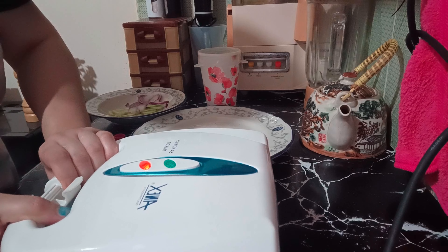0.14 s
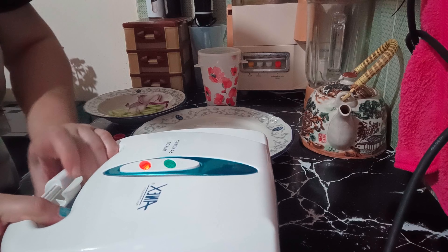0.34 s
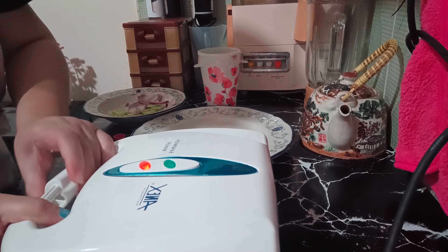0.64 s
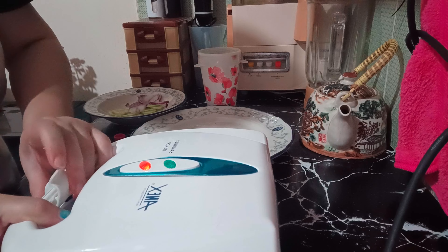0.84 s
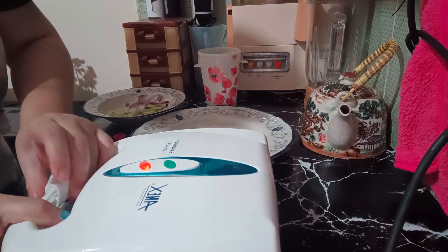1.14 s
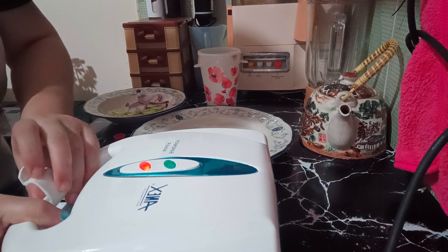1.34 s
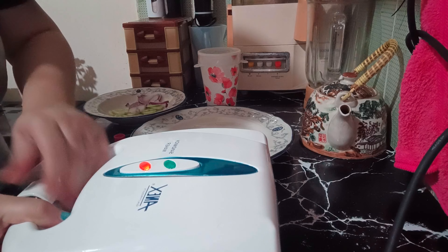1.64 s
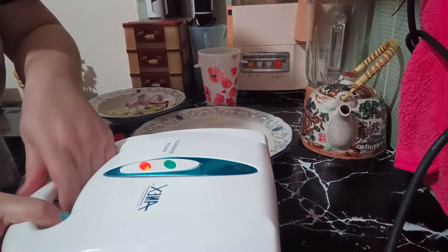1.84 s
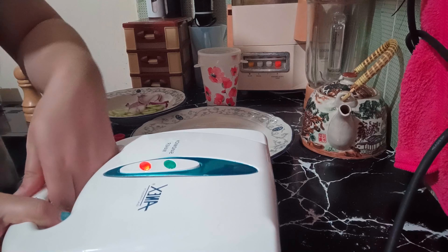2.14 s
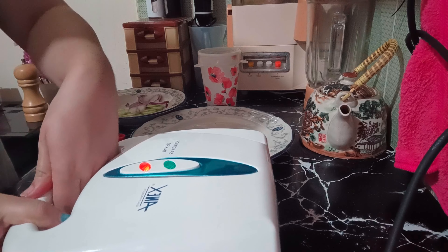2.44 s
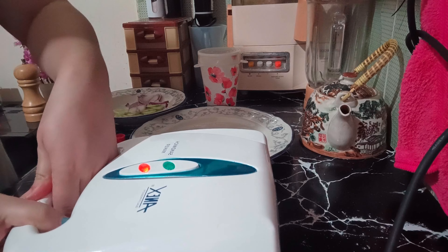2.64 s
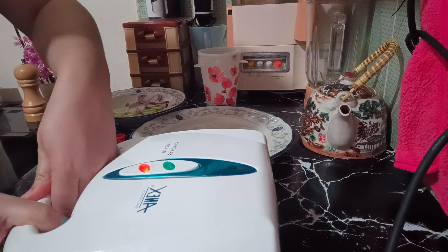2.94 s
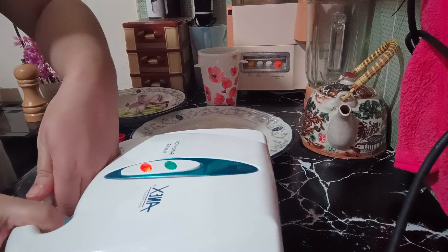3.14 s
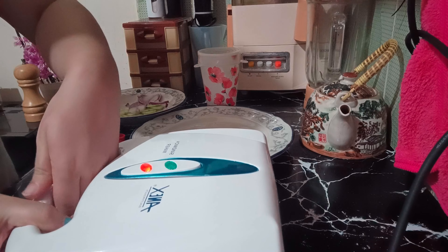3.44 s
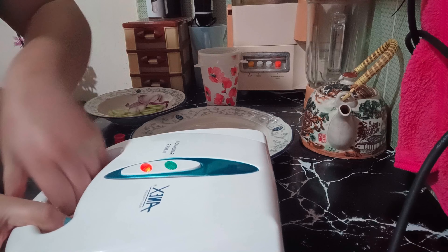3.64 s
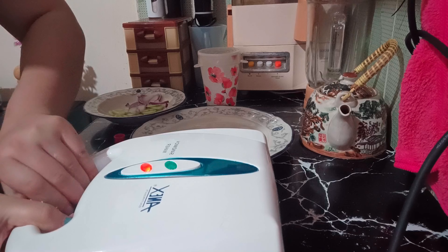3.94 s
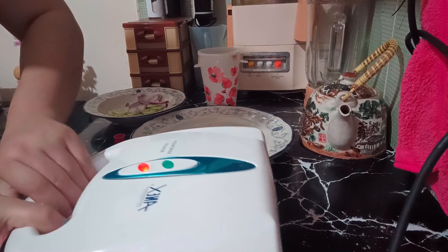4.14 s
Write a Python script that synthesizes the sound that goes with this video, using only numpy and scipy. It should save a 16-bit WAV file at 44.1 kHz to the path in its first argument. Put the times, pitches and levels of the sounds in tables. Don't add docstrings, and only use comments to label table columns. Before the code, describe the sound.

A sandwich maker's plastic latch is worked on a stone counter: a rising burst of light taps, a sharp click, a short rubbing creak, then the strongest snap with bright metallic ring. Lighter snaps come at intervals among dull knocks and soft bumps. After near quiet, tiny nail clicks lead into a weighty closing thump. Close, dry handling with short bright room reflections over quiet rumble.

```python
import sys
import numpy as np
from scipy import signal
from scipy.io import wavfile
from scipy.ndimage import map_coordinates

SR = 44100
rng = np.random.default_rng(int(sys.argv[2]) if len(sys.argv) > 2 else 0)


def master_out(mix):
    frames = np.transpose(np.atleast_2d(mix))
    ceiling = np.clip(frames, -1, 1)
    pcm = np.round(ceiling * 32767).astype(np.int16)
    wavfile.write(sys.argv[1], SR, pcm)


def invert_db(level):
    return 10 ** (np.asarray(level, dtype=float) / 20)


N = 188790

# (frequency [Hz], density [dB per Hz])
RUMBLE_SPECTRUM = [(25, -24), (150, -5), (240, -24.5), (345, -10), (1080, -23), (2690, -30), (11000, -43),
                   (14300, -84)]
# (frequency [Hz], correlation [-1..1])
RUMBLE_LIKENESS = [(60, 1), (240, -0.11), (950, 0.01), (3770, 0.2), (15000, -0.48)]
# (frequency [Hz], width [Hz], level [dB])
HUM = [(201.4, 57, -71.5), (345, 22, -84.5), (407.4, 3.4, -85)]
# (time [s], swell [dB])
LEANS = [
    (0.02, 3),
    (1.83, 8),
    (3.1, 5),
    (3.45, -3.5),
    (4.27, 9.5),
]
RUMBLE_DB, LEAN_S = -70.5, 0.11

# (frequency [Hz], t60 [s])
ROOM_T60 = [(300, 0.1), (1000, 0.31), (3000, 0.33), (7000, 0.29), (14000, 0.25)]
# (frequency [Hz], level [dB])
ROOM_COLOUR = [(250, -14), (600, 1.5), (1500, -12.5), (4000, -6.5), (8000, -9.5), (12000, -3.5),
               (15500, -14.5)]
# (frequency [Hz], level [dB], t60 [s])
PLATE_MODES = [(2850, -18, 0.12), (3576, -15.5, 0.96), (4330, -11.5, 0.13), (5840, -3, 0.32),
               (7150, 0.5, 0.41), (7330, -8.5, 0.12)]
# (time [s], frequency [Hz], level [dB], t60 [s])
AFTER_RING = [
    (1.826, 7560, -40, .5),
    (2.226, 2630, -57, .6),
    (2.226, 3600, -52, .4),
    (2.226, 5800, -56, .4),
    (2.226, 7900, -55, .4),
    (3.155, 3300, -55, .4),
    (3.155, 4500, -49, .45),
    (3.155, 5630, -49, .5),
    (3.155, 7600, -52, .4),
]
ROOM_DB, WAVER_T60_S = -8, 0.03

# (time [s], peak [dB], frequency [Hz], t60 [s], overtone [dB])
THUDS = [
    (0.009, -46.5, 184, 0.013, -9),
    (1.269, -57, 220, 0.072, -14),
    (1.42, -63.5, 102, 0.27, -9),
    (1.663, -48.5, 188.5, 0.24, -10.5),
    (1.827, -51, 196, 0.27, -9),
    (2.571, -43, 183, 0.18, -20),
    (2.618, -47, 133.2, 0.203, -6),
    (3.068, -57, 111.2, 0.1, -13),
]
# (time [s], peak [dB], frequency [Hz], t60 [s], overtone [dB])
SLAM = [
    (4.256, -15.5, 418.2, 0.068, -32),
    (4.265, -14.5, 155.6, 0.45, -2.5),
]

# (frequency [Hz], level [dB], t60 [s])
SHELL = [(500, -7.5, 0.032), (566, 14, 0.039), (633.6, 4, 0.15), (743, -1.3, 0.045)]
LID = [(857.6, -20.5, 0.053), (1052, -12, 0.042), (1186, -2, 0.014), (1547, -5.5, 0.024),
       (1824, -9, 0.0097), (1965, 1.5, 0.0097), (1930, -11.5, 0.019)]
HANDLE = [(880, -13, .03), (1085, 1.5, .045), (1300, -12, .025), (1560, -12, .02), (1850, -8, .025),
          (2150, -11, .02)]
LATCH = [(2510, -19, 0.0027), (2970, 3.5, 0.0027), (3490, -5, 0.011), (4104, -2.5, 0.0092),
         (4500, 3.5, 0.0014), (5605, 1, 0.00081)]
EDGE = [(6087, 1, 0.0017), (5883, 1.5, 0.0046), (7000, -9.5, 0.0027), (7700, -3.5, 0.013),
        (8234, -4.5, 0.00076)]
HINGE = [(5800, -11, .006), (6100, 3, 0.003), (6800, -7.5, 0.0027), (7900, -4, .008), (7850, -1, 0.0035)]
RIM = [(9100, -5.5, 0.0025), (10200, 3, 0.0015), (11400, -1.5, 0.0026), (12500, -3, 0.002),
       (13300, -1.5, .002), (15770, -4.5, 0.0036), (15470, -3, 0.0016)]
STRIKE_SPREAD_DB, SIDE_SPREAD_DB, SHELL_PAN_DB, PATH_SPREAD_MS = -2, 0.6, -5, 0.5

# (time [s], strength [dB], shell boom [dB], hardness [dB], chatter [ms])
CREEP = [(1.355, -43, -7.5, -10.5, 21.8), (1.7965, -45, 1, 0, 1.5), (1.805, -27.5, -21, -18, 8.6),
         (2.214, -58, 7, -18, 2.2), (2.50, -64, 5, -7.5, 43), (2.62, -63.5, 5, -18, 14.5),
         (3.03, -56.5, -9, -20, 28.5), (4.085, -65, 2, -6, 25.7), (4.145, -54.5, -9, -1.5, 4.6),
         (4.235, -36.5, -13, -21, 5.3), (4.2495, -70, 17, -4, 8)]
PRESSES = [
    (1.274, -49.5, 8.5, -18, 3.56),
    (1.378, -35, 2.5, -19.5, 2.9),
]
PADS = [
    (0.7743, -72.5, 0, -13, 9.8),
    (1.2309, -30, -24.5, -13, 4.2),
    (2.0914, -44.5, -24, -20.5, 1.5),
    (2.6885, -64, -23.5, 4.5, 4.85),
    (2.8616, -66, -12, -2, 3.66),
    (2.952, -69.5, 23.5, -5, 5.5),
    (3.0848, -50, -1, -17, 8),
    (3.5252, -70.5, -12, 1, 3.5),
    (3.6933, -64.5, -26, -11.5, 5.5),
]
KNOCKS = [(0.6214, -66.5, -11, -12.5, 9.3), (0.7322, -64.5, -18, -21, 31), (1.033, -52.5, -6.5, -24, 14),
          (1.0495, -31.5, -9, -22.5, 2.2), (2.408, -86, 12, 14, 6.3), (2.5654, -53.5, 3.5, -16, 4.1),
          (2.7704, -79.5, -9, 7.5, 4.2), (2.883, -71.5, 15, -12, 7.5), (2.909, -80, 0, 5.5, 2.75),
          (2.933, -85, 4, 9, 4.8), (4.1065, -66, -9, -3.5, 10.5)]
TAPS = [
    (0.2508, -55, -2.5, -3, 8.9),
    (0.3015, -42.5, -12, -5, 17),
    (0.3305, -30, -13.5, -9, 11),
    (0.3476, -24, -9.5, -15, 4.5),
    (0.960, -50.5, -11, 2, 10.7),
    (1.6484, -58.5, -6.5, -4.5, 16.5),
    (2.527, -48.5, -0.5, -21.5, 18),
    (2.6135, -45, -9, -30, 8.2),
    (3.049, -43, -0.5, -16.5, 8.5),
    (3.8964, -44, -20, -24, 7.3),
]
CLICKS = [
    (1.2265, -24, -23.5, -13.5, 3.7),
    (1.7527, -59.5, -23, 3.5, 3.33),
    (2.4562, -52, -11, -9.5, 7.2),
    (2.573, -51, -6.5, -6.5, 2.2),
    (4.156, -39, -41, 8, 3.6),
    (4.1741, -57.5, -16, 13, 4.3),
    (4.1802, -62, -20, 30.5, 4.5),
    (4.2005, -54, -34, 6, 5),
]
JOLTS = [
    (2.2245, -26.5, -14, -30, 2.6),
]

# (time [s], strength on lid [dB], latch over lid [dB], edge over latch [dB], chatter [ms])
SNAPS = [
    (1.8222, -21.5, 13, 0.5, 1.7),
    (1.8256, -15.5, 2.5, -3.1, 6.9),
]
RESNAPS = [
    (2.2245, -29, 8.5, -1.5, 1.13),
    (2.2265, -30, -1.05, 1, 1.25),
    (3.1520, -34.5, 21, -8, 1.5),
    (3.1565, -18.5, -7, -4.5, 1.62),
]
SHUT = [
    (4.2585, -23.5, -6, 3.5, 7.3),
    (4.2645, -22, 4, -29, 2.8),
]
SNAP_HOLLOW_DB, RESNAP_HOLLOW_DB, SHUT_HOLLOW_DB = -15.5, -18, 5

# (time [s], left minus right [dB], left lag [ms])
HAND = [
    (0.3, 0.5, 0.043),
    (1.05, 1.5, 0.022),
    (1.4, 2.5, 0.044),
    (1.703, -7, 0.08),
    (1.999, -7.5, 0.057),
    (2.199, 0, 0.012),
    (2.5, 1.18, 0.047),
    (3.15, 0.9, 0.026),
    (4.261, 0, 0.064),
]
HISS_DB, HISS_HZ, CUTOFF_HZ, HEADROOM = -80.5, 9900, 16800, 1.15


def at_hz(points, hz):
    points = np.array(points)
    return np.interp(np.log(hz), np.log(points[:, 0]), points[:, 1])


def rms_one(x):
    return x / np.sqrt(np.mean(x ** 2) + 1e-20)


def peak_one(x):
    return x / np.abs(x).max()


def filtered(x, order, hz, kind):
    return signal.sosfilt(signal.butter(order, hz, kind, fs=SR, output="sos"), x)


def ring(force, hz, t60_s):
    radius = invert_db(-60 / (max(t60_s, 0.002) * SR))
    angle = 2 * np.pi * hz / SR
    return signal.lfilter([0, np.sin(angle)], [1, -2 * radius * np.cos(angle), radius ** 2], force + 1e-18)


def add(track, sound, s):
    at = round(s * SR)
    track[at:at + len(sound)] += sound[:N - at]


def bands():
    edges = 30 * 2 ** np.arange(0, 9.2, 1 / 3)
    return [(np.sqrt(a * b), signal.butter(2, [a, b], "band", fs=SR, output="sos"))
            for a, b in zip(edges, edges[1:])]


def background():
    white = rng.standard_normal((2, 2, N))
    rumble = 0
    for k, (hz, sos) in enumerate(bands()):
        mid, side = signal.sosfilt(sos, white[k % 2])
        alike = np.clip(at_hz(RUMBLE_LIKENESS, hz), -1, 1)
        stereo = np.sqrt(1 + alike) * mid + np.sqrt(1 - alike) * side * [[1], [-1]]
        rumble = rumble + invert_db(at_hz(RUMBLE_SPECTRUM, hz)) * stereo
    drone = sum(invert_db(db) * rms_one(ring(rng.standard_normal(N), hz, 6.6 / width_hz))
                for hz, width_hz, db in HUM)
    t = np.arange(N) / SR
    swell_db = sum(db * np.exp(-((t - s) / LEAN_S) ** 2) for s, db in LEANS)
    return invert_db(RUMBLE_DB + swell_db) * rms_one(rumble) + drone


def kitchen(x, plate_db):
    t = np.arange(SR // 2) / SR
    white = rng.standard_normal((3, 2, len(t)))
    tail = 0
    for k, (hz, sos) in enumerate(bands()):
        if hz > 200:
            decay_db = at_hz(ROOM_COLOUR, hz) - 60 * t / at_hz(ROOM_T60, hz)
            tail = tail + invert_db(decay_db) * signal.sosfilt(sos, white[k % 2])
    lingering = sum(invert_db(db - 60 * t / t60_s) * rms_one(ring(white[2], hz, 0.013))
                    for hz, db, t60_s in PLATE_MODES)
    build_up = 1 - np.exp(-(t / 0.0017) ** 2)
    tail = (tail + invert_db(plate_db) * lingering) * build_up
    return signal.fftconvolve(x, tail / np.sqrt(np.sum(tail ** 2) / 2), axes=1)[:, :N]


def plates():
    out = np.zeros((2, N))
    t = np.arange(SR // 2) / SR
    for s, hz, level_db, t60_s in AFTER_RING:
        envelope = invert_db(level_db - 60 * t / t60_s) * (1 - np.exp(-t / 0.004))
        for side in out:
            add(side, envelope * rms_one(ring(rng.standard_normal(len(t)), hz, WAVER_T60_S)), s)
    return out


def thuds():
    out = np.zeros(N)
    push = np.zeros(SR // 3)
    push[:60] = np.hanning(60)
    for s, peak_db, hz, t60_s, overtone_db in THUDS + SLAM:
        low = peak_one(ring(push, hz, t60_s))
        high = peak_one(ring(np.diff(push, prepend=0), hz * 2.5, t60_s * 0.47))
        add(out, invert_db(peak_db) * (low + invert_db(overtone_db) * high), s)
    return filtered(out, 4, 85, "high")


def chatter(chatter_ms, suddenness):
    impacts = rng.standard_normal(8192) * (0.25 + (rng.random(8192) < 0.15))
    age = np.arange(8192) / SR * 1000 / max(chatter_ms, 0.3)
    return impacts * (1 - np.exp(-age * suddenness)) ** 2 * np.exp(-age)


def ring_part(part, force):
    sound = np.zeros((2, 8192))
    luck = rng.standard_normal((len(part), 4))
    for k, ((hz, db, t60_s), (strike, detune, pan, far)) in enumerate(zip(part, luck)):
        mode = peak_one(ring(force, hz * (1 + 0.02 * detune), t60_s))
        mode = (-1) ** k * invert_db(db + STRIKE_SPREAD_DB * strike) * mode
        pan_db = SIDE_SPREAD_DB * pan + SHELL_PAN_DB * (part is SHELL)
        for side, way in zip(sound, (1, -1)):
            delay = int(max(way * far, 0) * PATH_SPREAD_MS * SR / 1000)
            side += invert_db(way * pan_db / 2) * np.roll(mode, delay)
    reach_hz = [part[0][0] * 0.79, min(part[-1][0] * 1.08, 0.45 * SR)]
    return peak_one(filtered(sound, 3, reach_hz, "band"))


def contacts(table, face, edge, rim_db, suddenness):
    out = np.zeros((2, N))
    for s, latch_db, shell_db, face_db, edge_db, chatter_ms in table:
        force = chatter(chatter_ms, suddenness)
        levels = ((SHELL, shell_db), (face, face_db), (LATCH, latch_db), (edge, edge_db), (RIM, edge_db + rim_db))
        for part, level_db in levels:
            for track, side in zip(out, ring_part(part, force)):
                add(track, invert_db(level_db + 4.5) * side, s)
    return out


def touches(table, thin_db):
    return [(s, db + hard, db + boom, db, db + hard + thin_db, ms) for s, db, boom, hard, ms in table]


def bites(table, hollow_db):
    return [(s, db + latch, db + hollow_db, db, db + latch + edge, ms) for s, db, latch, edge, ms in table]


def hand_touches():
    knocks = touches(KNOCKS, thin_db=10.5) + touches(PADS, thin_db=-14.5)
    return (contacts(touches(CREEP, thin_db=3.5), LID, HINGE, rim_db=-9.5, suddenness=0.92)
            + contacts(touches(PRESSES, thin_db=10.5), HANDLE, HINGE, rim_db=-8.5, suddenness=1.4)
            + contacts(knocks, HANDLE, HINGE, rim_db=-24, suddenness=26)
            + contacts(touches(TAPS, thin_db=-11.5), LID, HINGE, rim_db=-10.5, suddenness=8.4)
            + contacts(touches(CLICKS, thin_db=-2.5), HANDLE, EDGE, rim_db=-4.5, suddenness=11)
            + contacts(touches(JOLTS, thin_db=-3), HANDLE, HINGE, rim_db=-12, suddenness=13))


def latch_snaps():
    hard = bites(SNAPS, SNAP_HOLLOW_DB) + bites(SHUT, SHUT_HOLLOW_DB)
    light = bites(RESNAPS, RESNAP_HOLLOW_DB)
    return (contacts(hard, LID, EDGE, rim_db=-4.5, suddenness=14)
            + contacts(light, LID, EDGE, rim_db=-16, suddenness=45))


def follow_hand(x):
    s, pan_db, lag_ms = np.transpose(HAND)
    t = np.arange(N) / SR
    pan_db, lag_ms = np.interp(t, s, pan_db), np.interp(t, s, lag_ms)
    late = map_coordinates(x[0], [np.arange(N) - lag_ms * SR / 1000], order=3)
    return np.array([late * invert_db(pan_db / 2), x[1] * invert_db(-pan_db / 2)])


def scene():
    handling = hand_touches()
    snaps = latch_snaps()
    near = follow_hand(snaps + handling)
    room = invert_db(ROOM_DB) * kitchen(snaps, plate_db=-39) + invert_db(ROOM_DB - 4) * kitchen(handling, plate_db=-37)
    body = thuds() * invert_db(np.array([[-0.4], [0.4]]))
    return near + room + body + background() + plates()


def band_limit(x):
    return signal.sosfilt(signal.butter(12, 16420, fs=SR, output="sos"), x)


def record(dry):
    hiss = filtered(rng.standard_normal((2, N)), 4, HISS_HZ, "high")
    rounded = HEADROOM * np.tanh(dry / HEADROOM) + invert_db(HISS_DB) * hiss
    full = filtered(rounded, 3, 62, "high")
    mix = signal.sosfilt(signal.cheby2(12, 60, CUTOFF_HZ, fs=SR, output="sos"), full)
    return band_limit(mix)


dry = scene()
out = record(dry)
master_out(out)
```